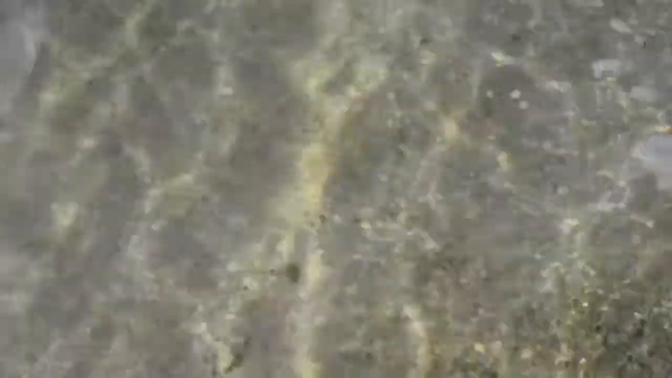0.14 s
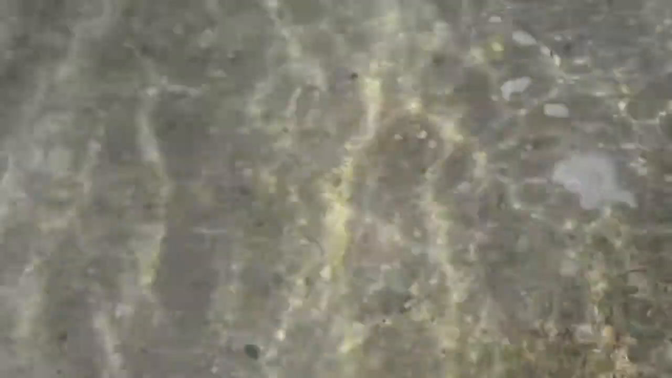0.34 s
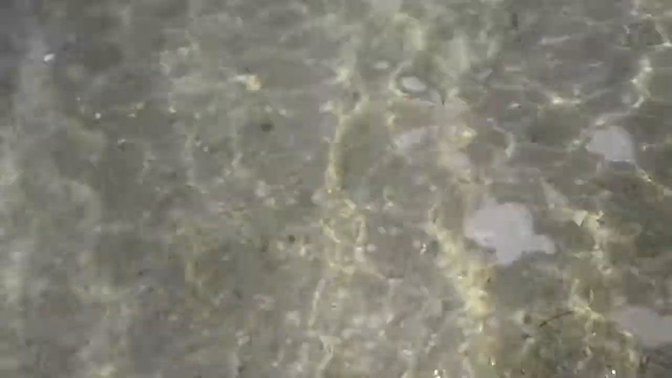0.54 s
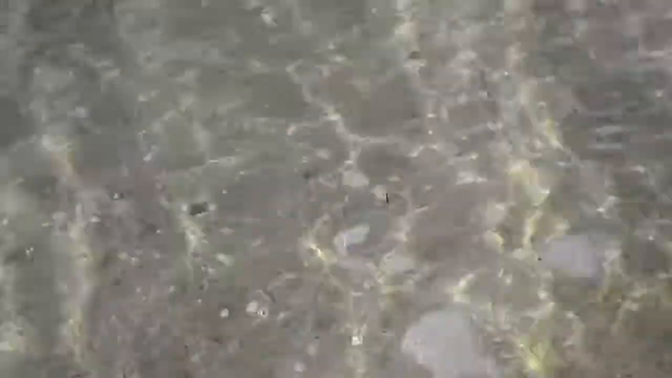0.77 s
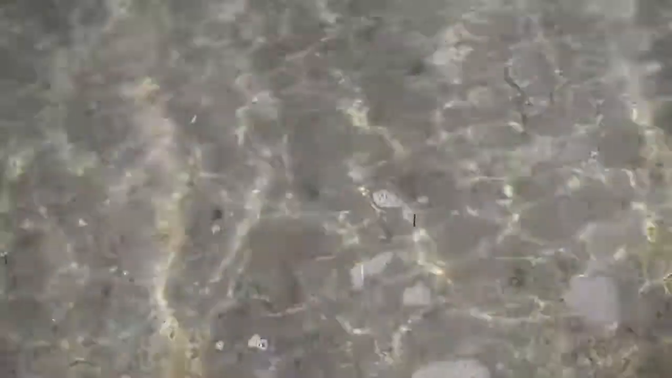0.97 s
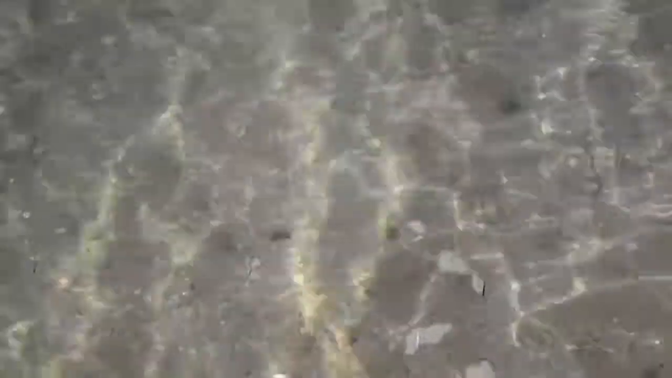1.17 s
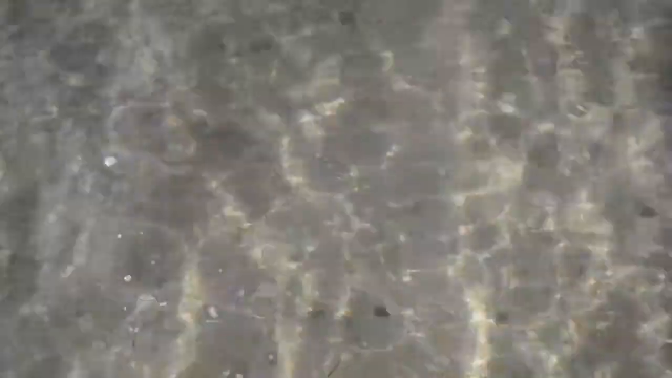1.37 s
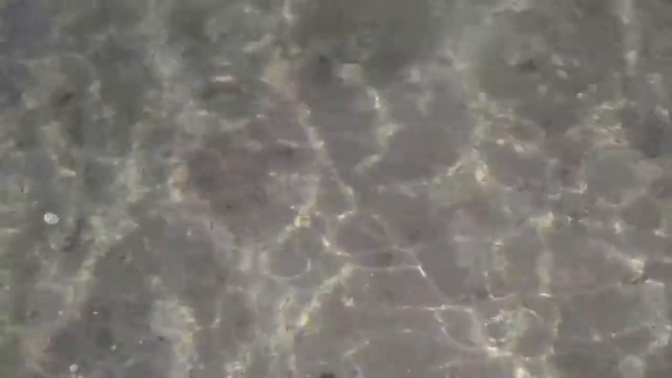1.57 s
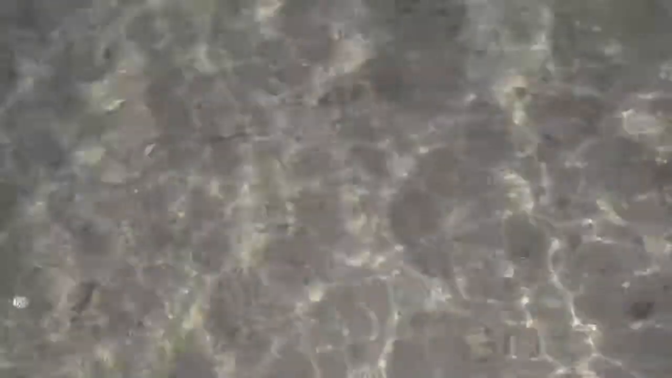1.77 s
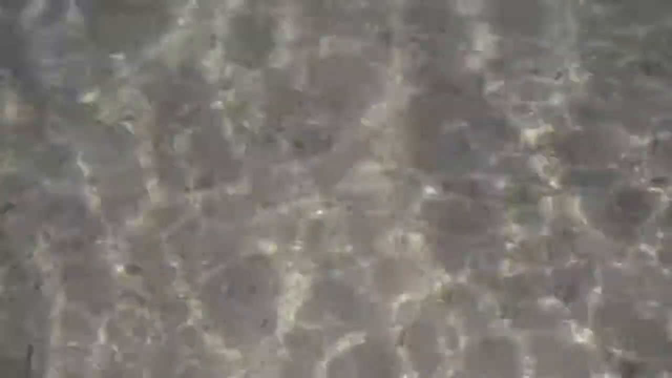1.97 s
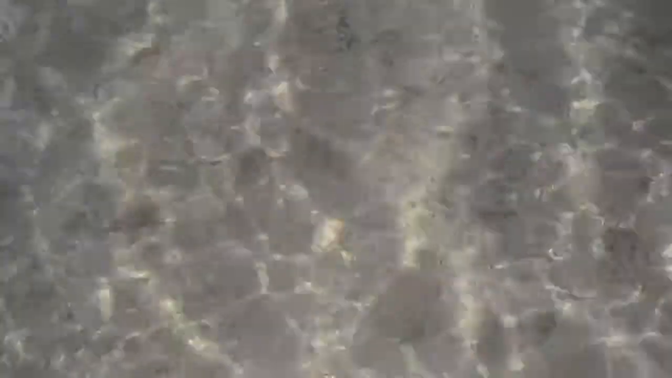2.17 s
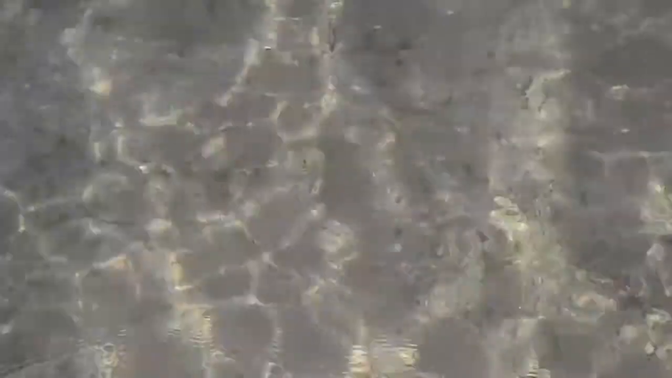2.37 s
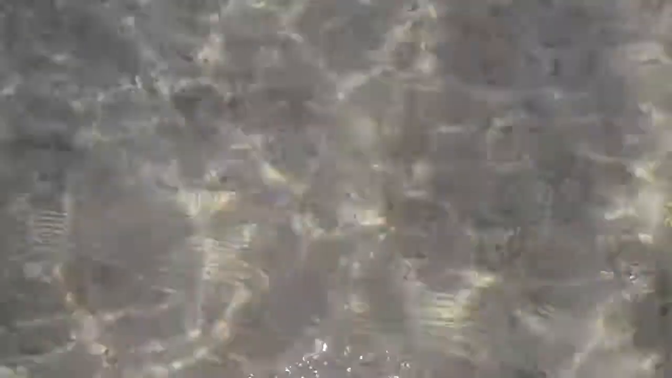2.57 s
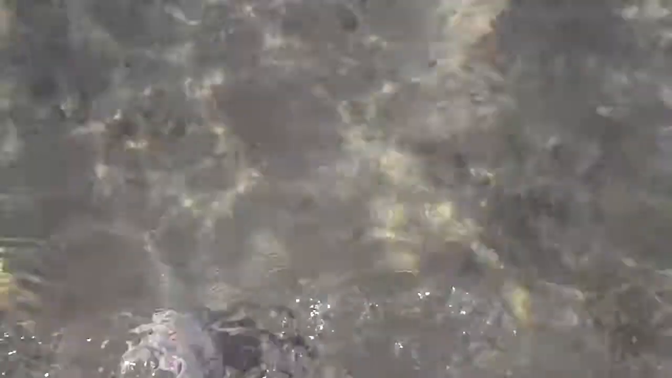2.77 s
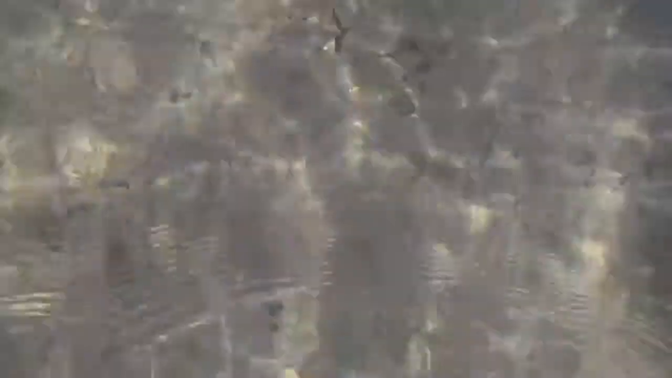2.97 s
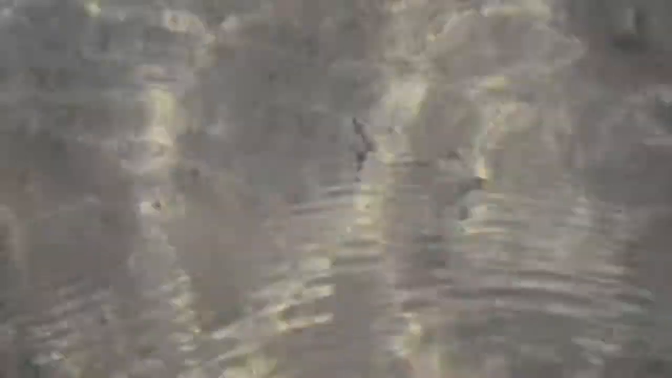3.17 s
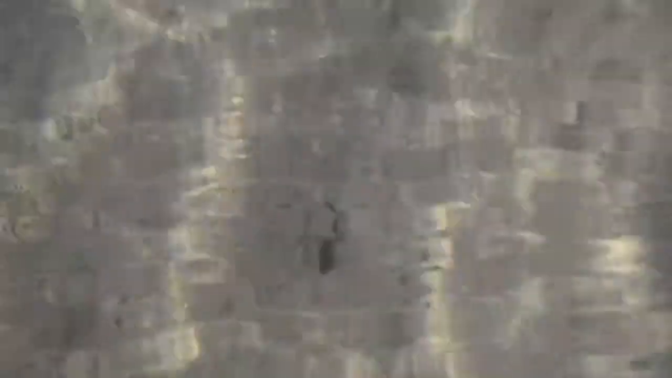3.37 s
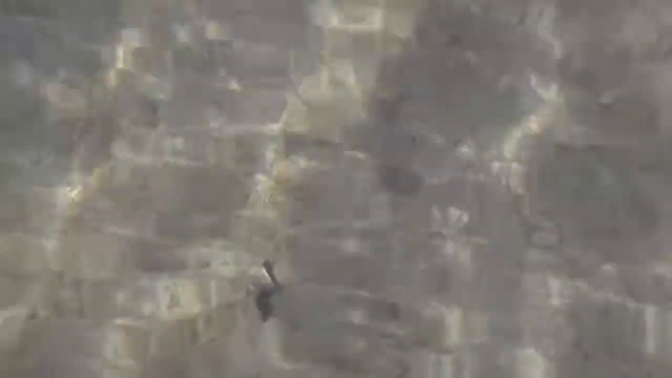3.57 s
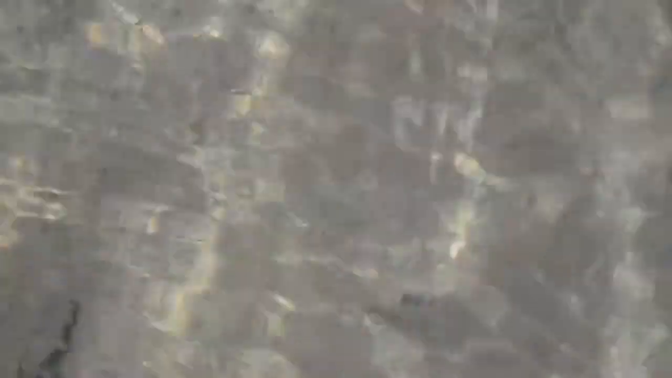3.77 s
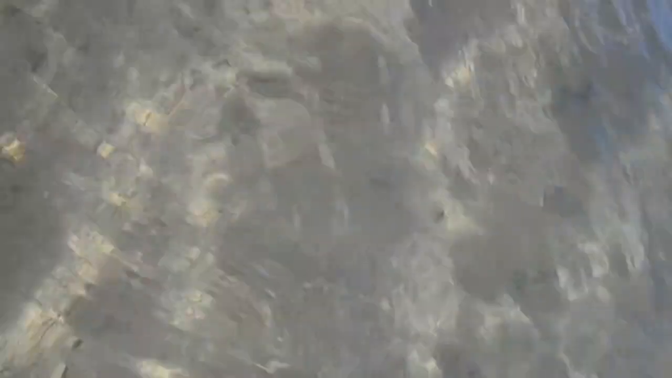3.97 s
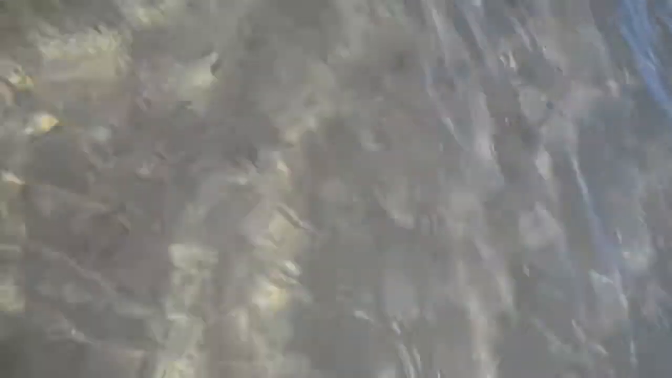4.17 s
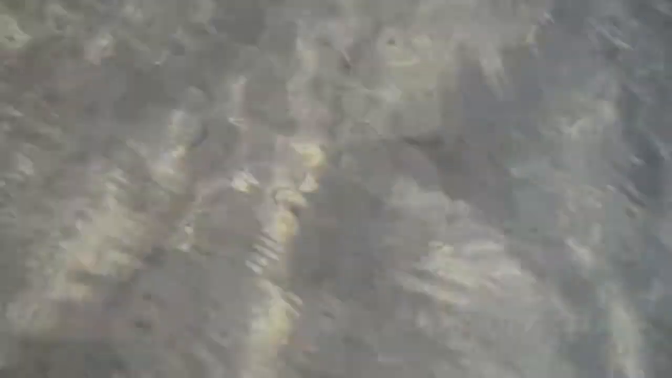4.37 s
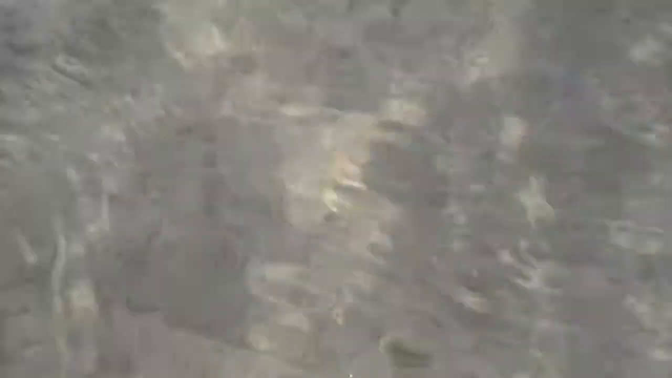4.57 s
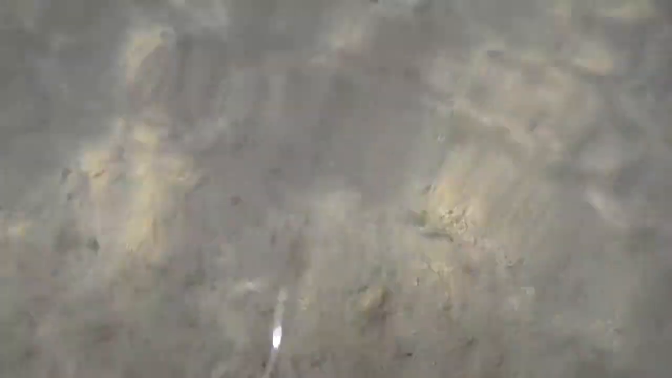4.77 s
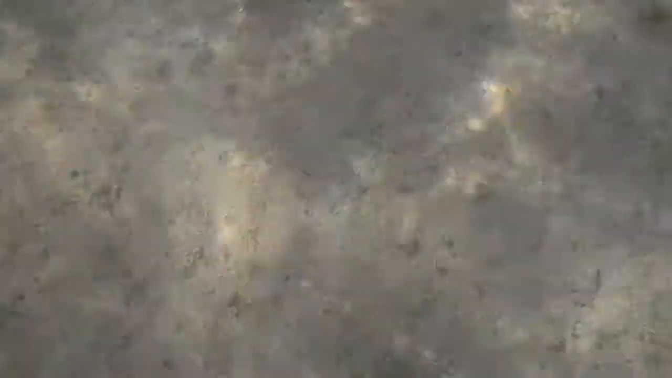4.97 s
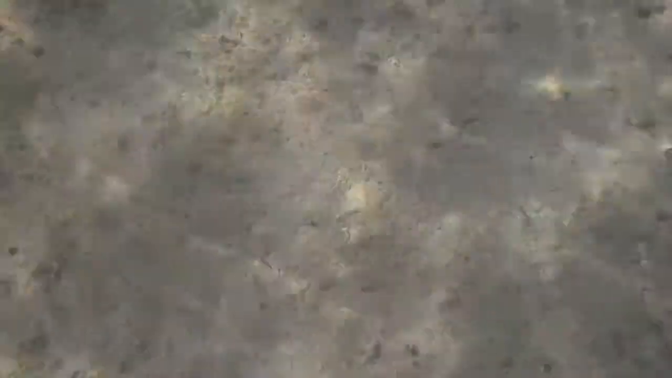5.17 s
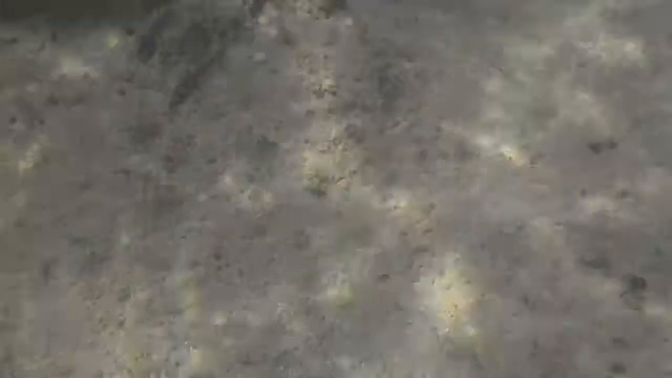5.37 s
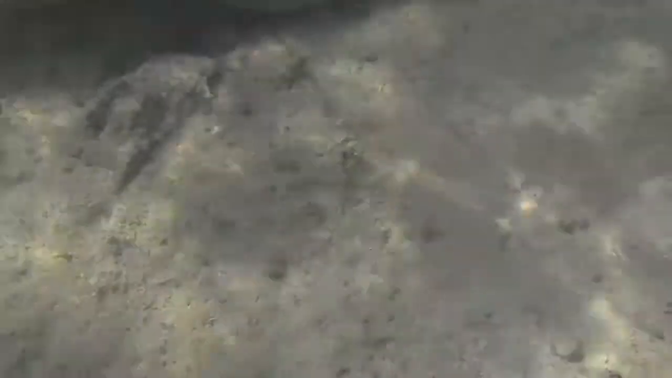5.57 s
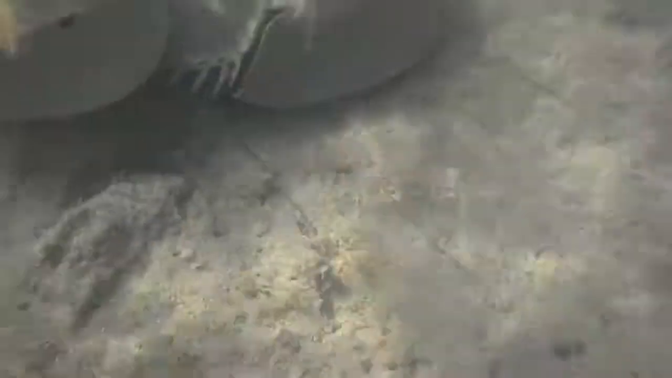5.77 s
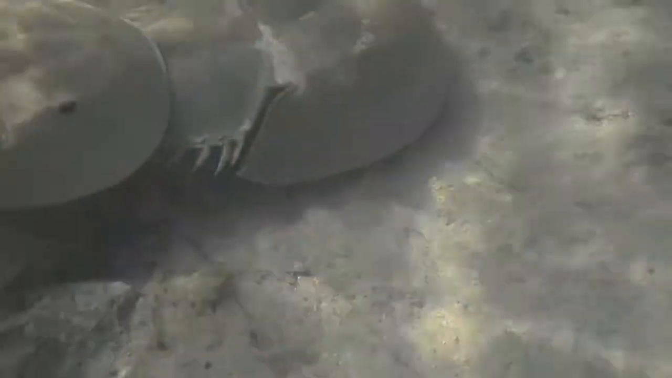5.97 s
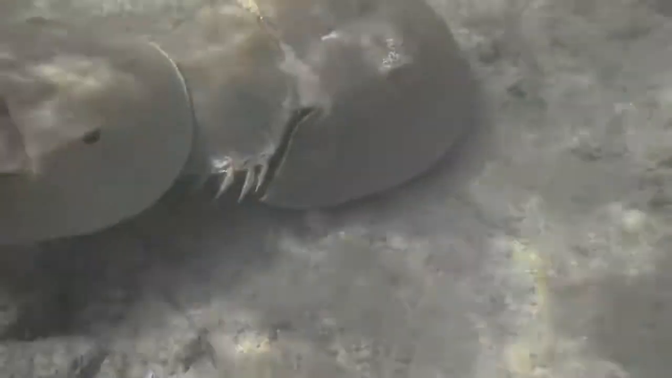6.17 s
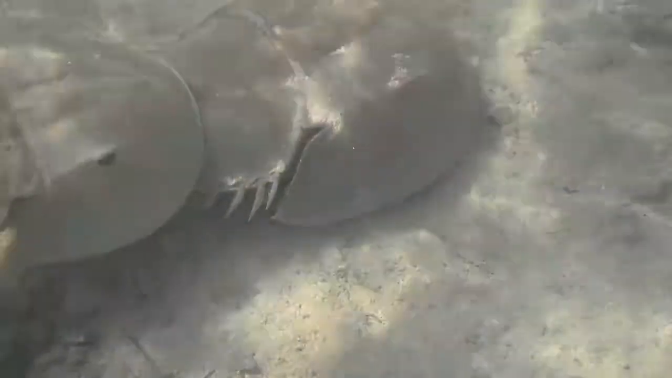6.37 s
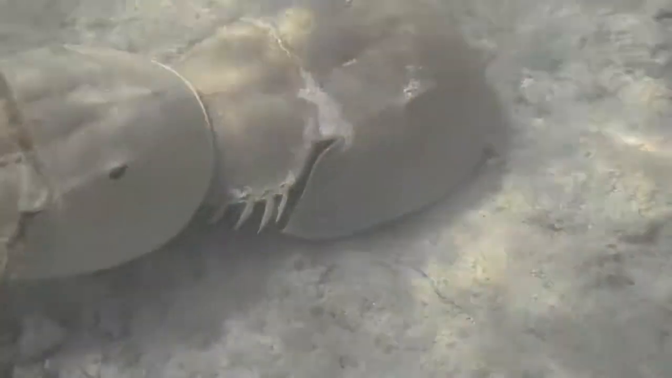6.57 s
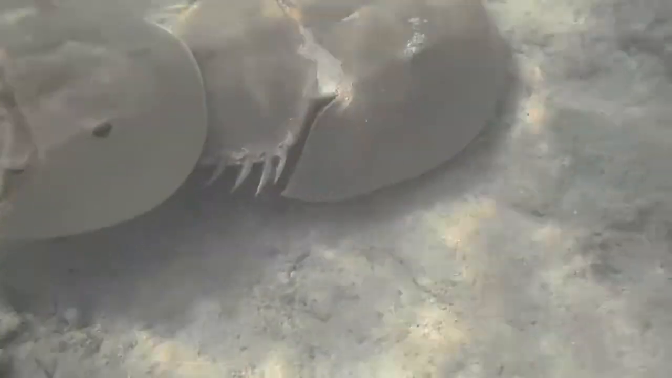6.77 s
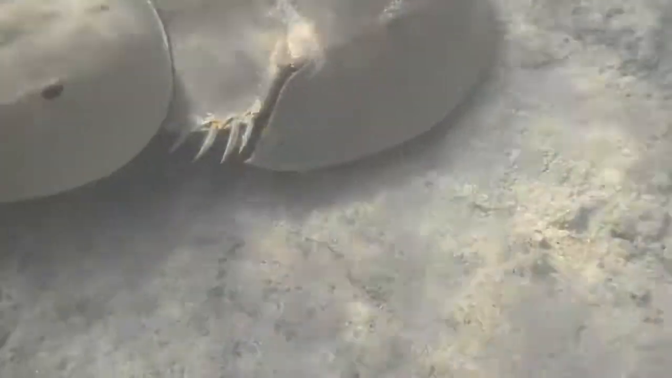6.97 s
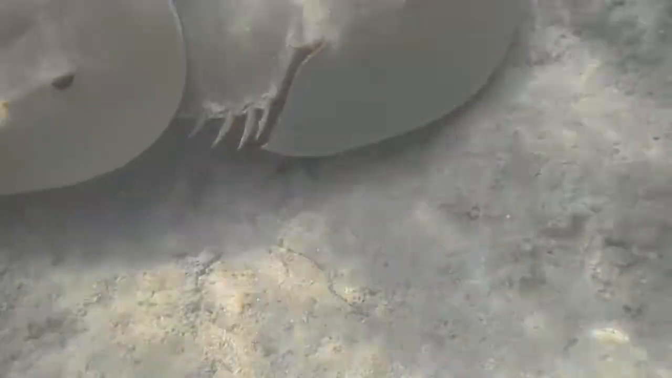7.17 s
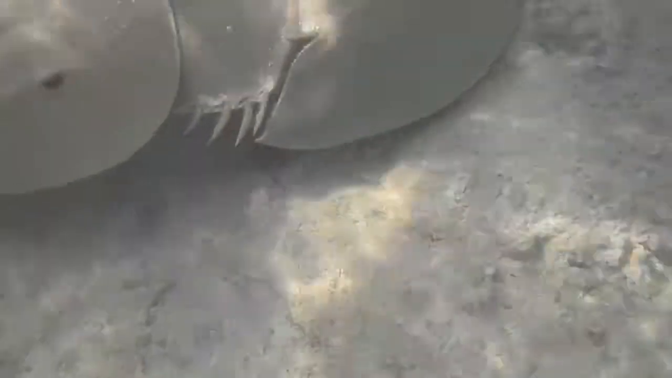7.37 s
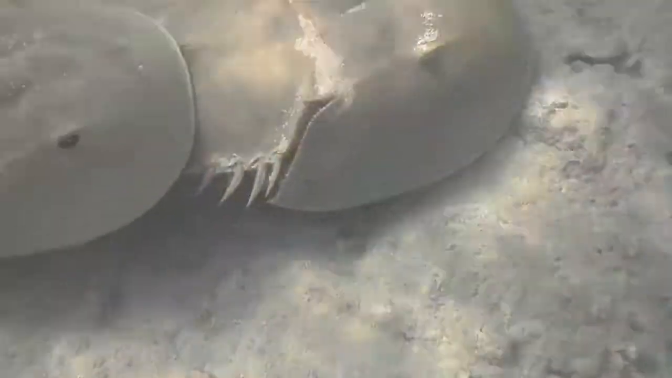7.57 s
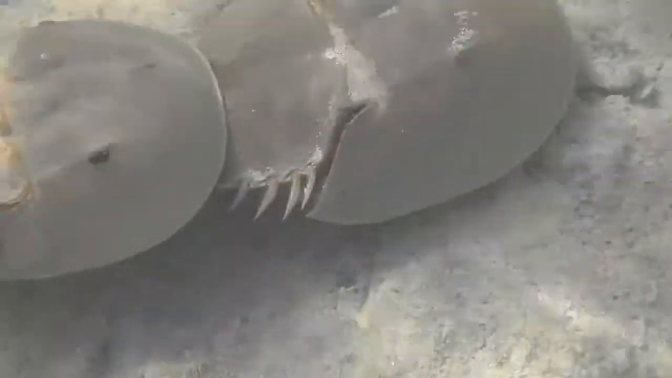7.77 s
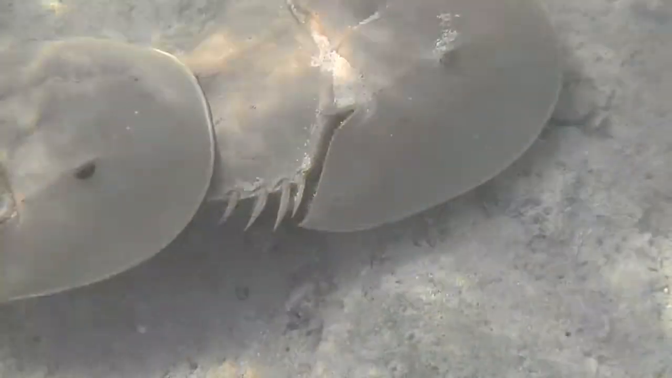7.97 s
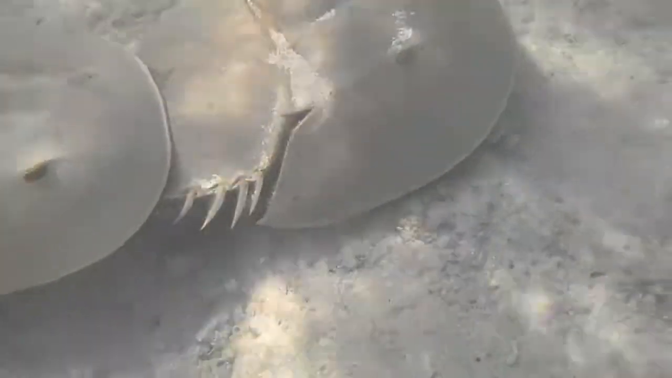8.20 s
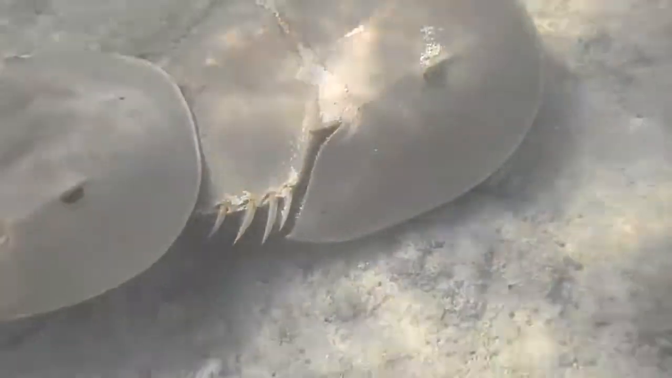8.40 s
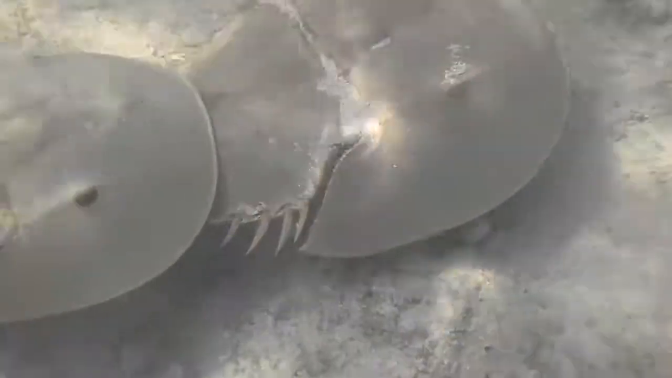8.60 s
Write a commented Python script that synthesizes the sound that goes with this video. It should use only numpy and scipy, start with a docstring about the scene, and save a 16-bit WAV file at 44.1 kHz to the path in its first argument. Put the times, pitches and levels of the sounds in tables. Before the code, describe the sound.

Shallow water washes and fizzes close up, then a splash under the surface brings loud, low glugs of air and a muffled rumble.

```python
"""Shallow water, very close, on the one microphone of a small camera in a waterproof housing.
For five seconds it is carried over the surface: wash and fizz, bubbles plopping, water knocking, ticking
and spurting on the housing. Then it is pushed under with a splash. Air leaves the housing in loud glugs,
each a neck of air parting and a pocket ringing, that overload the preamplifier. They come first in a
flurry, then ever more rarely, over a muffled underwater rumble and murmur."""
import sys
import numpy as np
from scipy import signal
from scipy.io import wavfile
from scipy.ndimage import uniform_filter1d

SR = 44100
rng = np.random.default_rng(int(sys.argv[2]) if len(sys.argv) > 2 else 0)


def to_wav(sig):
    """Store sig (one row per channel, or 1-D mono) as 16-bit WAV at the path in sys.argv[1].

    Samples outside -1..1 are clipped; the rate is SR.
    """
    pcm = np.clip(np.atleast_2d(sig), -1, 1) * 32767
    pcm = np.round(pcm).astype(np.int16)
    wavfile.write(sys.argv[1], SR, pcm.T)  # frames by channels


N = 380935
DIVE_S = 5.1

# Air pinching off at the housing. Each row: time in seconds, snap level in dB, ring level in dB,
# pitch of the air pocket in Hz, its t60 in seconds.
GLUGS = [(5.091, 0, -18, 99, .06), (5.101, 0, -25, 100, 0.14), (5.123, 0, -28, 98, .1),
         (5.152, -4.5, -16, 99, 0.11), (5.191, -6, -26, 94, .1), (5.207, 6, -4, 83, 0.062),
         (5.259, -9, -26, 100, 0.11), (5.267, 4.5, -17, 76, 0.077), (5.313, 1, -4.5, 94, 0.14),
         (5.324, 8, -13, 128, 0.065), (5.356, -6, -9, 78, 0.11), (5.423, 12.5, -8.5, 84, 0.25),
         (5.476, -5.5, -16, 101, 0.15), (5.51, 4, -4.5, 98, 0.13), (5.558, 3.5, -8, 101, 0.067),
         (5.613, 3.5, -10.5, 167, 0.054), (5.669, -3, -32, 101, .1), (5.679, -2.5, -13, 166, 0.041),
         (5.755, 1.5, -10, 149, 0.049), (5.812, -6.5, -14.5, 108, 0.11), (5.844, 4.5, -5, 165, 0.054),
         (5.924, 12.5, -8, 101, 0.18), (5.948, 8.5, -7, 82.5, 0.054), (6.015, 9, -6, 105, 0.056),
         (6.046, 12.5, 0, 176, 0.058), (6.159, 13.5, 5, 90, 0.093), (6.279, 12.5, 0, 90, 0.12),
         (6.325, -9.5, -21, 118, .15), (6.422, 12.5, 6.5, 92.4, 0.079), (6.537, 9.5, -0.5, 87.6, 0.18),
         (6.715, 11.5, 1, 93, 0.086), (6.887, -4, -31, 99, .1), (6.896, 13.5, 2.5, 101.4, .12),
         (6.986, 14, 5, 95.5, 0.14), (7.219, 6.5, -4, 93.7, 0.31), (7.779, -4.5, -8.5, 116, 0.16)]
# Modes of the housing. Each row: mean pitch in Hz, relative level in dB, share of the housing's t60.
HOUSING_MODES = [(55, -9, .7), (168, -4, .5), (230, -10, .4), (305, -5, .5)]
# Small bubbles slipping out. Each row: start in seconds, level in dB, starting pitch in Hz.
CHIRPS = [(5.218, -37, 1450), (5.274, -34, 1250), (5.361, -35, 1600), (5.62, -29.5, 1100)]
# Water and hand on the housing. Each row: start in seconds, level in dB, starting pitch in Hz.
KNOCKS = [(0.326, -20, 81), (0.397, -16.5, 138), (0.555, -11.5, 178), (1.235, -14.5, 266),
          (1.547, -9.5, 100), (2.234, -10, 90), (3.31, -24, 108), (3.641, -11.5, 151), (4.045, -12, 111),
          (4.063, -7.5, 108), (4.091, -8, 72.5), (4.184, -8, 106), (4.947, -4.5, 73.4), (4.986, -2.5, 144),
          (5.046, -5.5, 380), (5.465, -3, 296), (5.94, -6.5, 160), (6.378, -7, 73), (7.193, -8.5, 106),
          (7.744, 1, 96), (8.35, -11.5, 73), (8.39, -7, 116)]
# Bubble plops and, near 3.5 kHz, short ringing ticks on the housing.
# Each row: start in seconds, level in dB, starting pitch in Hz.
PLOPS_AND_TICKS = [(.268, -24.5, 790), (.289, -30.5, 4100), (0.655, -12, 1074), (0.764, -24, 3530),
                   (0.807, -18.5, 470), (1.023, -13.5, 1650), (1.185, -24, 715), (1.243, -19.5, 740),
                   (1.327, -21, 1010), (1.413, -23.5, 760), (1.589, -24.5, 3430), (1.656, -24, 3350),
                   (2.242, -23, 4100), (2.37, -28.5, 3540), (2.42, -28, 3400), (2.509, -26.5, 3260),
                   (2.626, -27, 1180), (2.719, -27, 684), (2.87, -23, 2530), (2.91, -23, 3320),
                   (3.204, -21.5, 1000), (3.323, -14, 860), (3.643, -13, 2620), (3.67, -22, 830),
                   (3.802, -16, 3550), (3.902, -11.5, 760), (3.959, -18, 633), (4.912, -12.5, 656),
                   (5.025, -14, 920), (5.034, -20, 1900), (5.047, -12.5, 2680), (5.15, -22, 1720),
                   (5.189, -18, 4440), (5.212, -19, 1500), (5.269, -22.5, 1415), (5.388, -36, 2650),
                   (5.404, -16.5, 1180), (5.465, -12.5, 1230), (5.495, -16.5, 1330), (5.542, -40, 1290),
                   (5.599, -15, 960), (5.599, -29, 2050), (5.667, -30, 1270), (5.811, -23.5, 1330),
                   (5.833, -30.5, 3300), (5.879, -37.5, 2300), (5.962, -25.5, 3190), (6.17, -17.5, 920),
                   (6.288, -21, 1030), (6.541, -14, 1280), (7.146, -28.5, 3610), (7.366, -14, 516),
                   (7.367, -22.5, 1210), (8.35, -18, 800), (8.36, -18.5, 817), (8.369, -17, 502),
                   (8.383, -14.5, 425), (8.504, -28.5, 730)]
# Drops on the housing. Each row: start in seconds, level in dB ahead of the cavity.
DROPS = [(0.338, -29), (1.022, -24), (1.656, -42), (1.982, -21.5), (2.242, -15.5), (2.572, -23),
         (2.911, -40), (3.643, -7.5), (3.801, -13), (3.903, -16), (4.912, -26), (5.022, -22), (5.035, -7),
         (5.189, -23), (5.211, -22), (5.356, -20), (5.426, -25), (5.464, -28), (6.268, -49)]
# Air cavity in front of the microphone. Each row: pitch in Hz, bandwidth in Hz, relative level in dB.
CAVITY_MODES = [(1500, 380, -10.5), (2330, 300, 22), (2850, 205, 17.5), (3530, 81, 12.5), (4500, 870, -46),
                (6500, 3800, -36)]
# Gushes over the housing. Each row: start and length in seconds, level in dB, brightness in dB
# (added to a bright hiss, taken off a dull one).
SPURTS = [(2.229, 0.078, -34, -6), (2.872, 0.092, -50, 9), (3.438, .03, -39, 8), (3.471, 0.35, -41, 5),
          (4.085, 0.071, -31.5, -4.5), (4.152, 0.092, -33.5, -1.5), (4.182, 0.039, -34.5, 1),
          (4.226, 0.081, -35.5, -6.5), (4.366, 0.062, -32, -7), (4.432, 0.025, -39, 6),
          (4.631, 0.041, -42, 8), (4.894, 0.055, -21.5, -2.5), (4.949, 0.02, -18.5, -1),
          (4.958, 0.068, -47, 4), (4.996, 0.0083, -21.5, -1.5), (5.054, 0.0094, -16.5, -7.5),
          (6.627, 0.058, -28, -26), (8.325, 0.095, -28, -28)]
# The surface. Each row: time in seconds, slosh level in dB, babble level in dB, babble resonance in Hz.
WASH = [(.045, -40.5, -45, 450), (.3, -37.5, -39, 420), (.6, -40.5, -34.5, 830), (.9, -39, -37.5, 473),
        (1.5, -34.5, -35.5, 443), (2.15, -41, -31.5, 440), (2.55, -37, -33, 490), (2.75, -33.5, -36, 870),
        (2.95, -38.5, -32, 1010), (3.15, -34.5, -36.5, 910), (3.4, -30.5, -30, 740), (4.1, -36.5, -35, 704),
        (4.88, -37, -36.5, 706), (5.1, -34, -40.5, 600)]
# Ripples and foam. Each row: time in seconds, level in dB, tilt of the hiss in dB an octave.
FIZZ = [(.045, -50.5, 0), (.27, -50.5, -1), (.6, -34, -1.5), (.93, -45.5, 0), (1.05, -37, -7),
        (1.35, -48, 3), (2.0, -44.5, -4.5), (2.6, -46.5, -1), (3.3, -50.5, 0.5), (3.9, -47.5, -3.5),
        (4.55, -49.5, 1.5), (4.85, -56, -2.5), (5.1, -32, -18)]
# The bed below the surface. Each row: time in seconds, rumble level in dB, murmur level in dB.
UNDERWATER = [(5.0, -27, -58), (5.3, -26, -51), (5.6, -27.5, -57), (5.72, -43, -58), (5.9, -26, -48.5),
              (6.15, -26, -41), (6.4, -20, -40.5), (6.7, -29, -41.5), (7.1, -27.5, -38.5),
              (7.5, -36.5, -40), (7.9, -35, -39.5), (8.64, -34.5, -42)]
# Spectra of the water noises. Each row: frequency in Hz, relative level in dB.
SPURT_COLOUR = [(400, -8), (800, 7.5), (1700, -4), (2300, -2.5), (2900, -7), (3650, -1), (4100, -8),
                (4600, -9.5), (5400, -15), (6000, -23), (7500, -31.5), (14000, -49)]
SLOSH_COLOUR = [(20, -20), (60, 0.5), (95, 2), (180, 1.5), (300, -7), (500, -49), (1200, -19), (5000, -60)]
BABBLE_COLOUR = [(150, -23.5), (300, 2.5), (600, -9), (950, -7.5), (1300, -26.5), (2000, -44.5),
                 (5000, -62)]
FIZZ_COLOUR = [(500, -20), (1100, 6), (1600, 3), (2300, -2.5), (2900, -4), (3600, 3.5), (4600, -10.5),
               (6000, -17), (8000, -26), (14000, -67)]
RUMBLE_COLOUR = [(20, -6), (50, 8), (100, 0), (210, 0), (280, -16), (500, -15.5), (1200, -72)]
MURMUR_COLOUR = [(150, -22), (225, 1.5), (300, -7.5), (500, -5.5), (680, -5), (830, -2), (1250, -0.5),
                 (1700, -1), (2200, -21.5), (3400, -23), (4500, -32), (5500, -42.5), (14000, -58)]


def glug(snap_db, ring_db, pocket_hz, pocket_t60, lead_s):
    """Pressure sags as a neck of air narrows, snaps over when it parts, then the trapped air rings."""
    housing_t60, crack_s = .11, .0001
    t = np.arange(round((lead_s + max(pocket_t60, housing_t60)) * SR)) / SR - lead_s
    after = np.maximum(t, 0)  # seconds since the neck parted
    sag = .75 * np.exp(-(np.minimum(t, 0) / .0022) ** 2)
    swing_hz = 88.16 + 4.18 * max(-snap_db, 0)  # weak snaps: narrower necks, faster swing
    swing = gain_of(-60 * after / .026) * np.cos(2 * np.pi * swing_hz * after * (1 + 25 * after) - .5)
    turnover = np.tanh(19.21 * swing_hz * t / gain_of(.43 * snap_db))  # slower for strong snaps
    snap = gain_of(snap_db) * turnover * np.where(t < 0, sag, swing)
    crack = gain_of(-42 + 1.7 * snap_db) * (after / crack_s * np.exp(1 - after / crack_s)) ** 2
    bend = 1.1 * (1 - np.exp(-after / .019))  # the ring starts sharp and settles
    ring = np.sin(2 * np.pi * pocket_hz * after + bend) * gain_of(-60 * (after / pocket_t60) ** .82)
    housing_db = 3.5 - .06 * ring_db  # the housing follows a louder pocket only partly
    for hz, db, share in HOUSING_MODES:
        phase = 2 * np.pi * (hz * rng.uniform(.89, 1.105) * after + rng.random())
        ring += gain_of(db + housing_db - 60 * after / (share * housing_t60)) * np.sin(phase)
    onset = 1 - np.exp(-(after / .0023) ** 2)
    return snap + crack + gain_of(ring_db) * ring * onset


def glugs():
    """Air leaves the housing gulp by gulp, right at the microphone."""
    out, lead_s = np.zeros(N), .008
    for s, *shape in GLUGS:
        add(out, s - lead_s, glug(*shape, lead_s))
    return out


def froth():
    """Each glug sheds a short cloud of small bubbles."""
    cloud, t = np.zeros(N), np.arange(round(.06 * SR)) / SR
    for s, snap_db, *_ in GLUGS:
        add(cloud, s + .002, gain_of(.5 * snap_db + rng.normal(0, 3) - 60 * t / .041))
    low = swarm(664, 1700, per_s=220, cycles=15, spread_db=3)
    high = swarm(1800, 3850, per_s=120, cycles=12, spread_db=3)
    return cloud * (gain_of(-28.5) * low + gain_of(-41.5) * high)


def chirps():
    """Small bubbles whistle upwards as they slip out."""
    out = np.zeros(N)
    for s, db, hz in CHIRPS:
        add(out, s, gain_of(db) * rising_ring(hz, t60=.024, glide=.7, sharpness=1.1))
    return out


def knocks():
    """Handling noise: water and hand bump the housing, which gives a short, low ring."""
    out = np.zeros(N)
    for s, db, hz in KNOCKS:
        add(out, s, -gain_of(db) * rising_ring(hz, t60=.041, glide=.11))
    return out


def plops_and_ticks():
    """Bubble plops and short, high, ringing ticks on the housing: each a main tone and two weaker ones."""
    out = np.zeros(N)
    for s, db, hz in PLOPS_AND_TICKS:
        glide = .16 if s > DIVE_S else .1
        for k, (detune, delay) in enumerate(rng.random((3, 2))):
            tone_hz, tone_db = (hz, db) if k == 0 else (hz * (.677 + .763 * detune), db - 11)
            t60 = .026 * (1000 / tone_hz) ** .75  # high tones die sooner
            add(out, s + .003 * delay * k, gain_of(tone_db) * rising_ring(tone_hz, t60, glide))
    return out


def drops():
    """Drops tick on the housing and ring the air cavity in front of the microphone."""
    hits, t = np.zeros(N), np.arange(256) / SR
    for s, db in DROPS:
        spray = rng.standard_normal(len(t)) * np.exp(-t / .0021)
        add(hits, s, gain_of(db) * spray / np.linalg.norm(spray))
    t = np.arange(400) / SR
    cavity = sum(gain_of(db) * np.exp(-np.pi * width * t) * np.sin(2 * np.pi * hz * t)
                 for hz, width, db in CAVITY_MODES)
    return signal.oaconvolve(hits, cavity / abs(cavity).max())[:N]


def spurts():
    """Water gushes over the housing: rough hiss that starts and stops abruptly."""
    dull = noise(SPURT_COLOUR, patchy_db=2, flicker_db=.7, size=256, eq=lambda t, hz: tilt(-14, hz))
    bright = noise(SPURT_COLOUR, patchy_db=2, flicker_db=.7, size=256, eq=lambda t, hz: tilt(5, hz))
    out, edges_s = np.zeros(N), .021  # rise and fall together
    for start, length, db, brightness in SPURTS:
        span = slice(round(start * SR), round((start + length) * SR))
        hiss = unit_rms(gain_of(-brightness) * dull[span] + gain_of(brightness) * bright[span])
        swell_db = np.linspace(0, 1, len(hiss))
        gate = signal.windows.tukey(len(hiss), min(edges_s / length, .6))
        add(out, start, gain_of(db + swell_db) * gate * hiss)
    return out


def wash():
    """The surface just below the microphone: low slosh, and a babble of bubbles and resonant noise."""
    def resonance_db(t, hz):
        return 9 * np.exp(-(np.log((hz + 1) / curve(WASH, t, 3)) / .3) ** 2)
    slosh = noise(SLOSH_COLOUR, patchy_db=.75, flicker_db=2.6, size=1024)
    babble = noise(BABBLE_COLOUR, patchy_db=2.5, flicker_db=.17, size=512, eq=resonance_db)
    babble += gain_of(-3.5) * swarm(272.4, 1258, per_s=200, cycles=14.4, spread_db=1.54)
    return level(WASH, 1) * slosh + level(WASH, 2) * unit_rms(babble)


def fizz():
    """Ripples and foam before the dive: flickering hiss and tiny bubbles."""
    hiss = noise(FIZZ_COLOUR, patchy_db=2.6, flicker_db=1.2, size=256,
                 eq=lambda t, hz: tilt(curve(FIZZ, t, 2), hz))
    foam = swarm(1430, 4540, per_s=300, cycles=17.5, spread_db=3.4)
    return level(FIZZ, 1) * unit_rms(hiss + gain_of(-3) * foam)


def underwater():
    """The background once submerged: lumpy rumble and smooth murmur through the flooded port."""
    rumble = noise(RUMBLE_COLOUR, patchy_db=2.65, flicker_db=2.2, size=1024)
    murmur = noise(MURMUR_COLOUR, patchy_db=1.9, flicker_db=1, size=512)
    return level(UNDERWATER, 1) * rumble + level(UNDERWATER, 2) * murmur


def rising_ring(hz, t60, glide, sharpness=2.8):
    """A damped sine that climbs like a bubble nearing the surface, by 2 * glide * hz over t60 seconds."""
    t = np.arange(round(max(t60, .004) * SR)) / SR
    onset = 1 - np.exp(-(t * hz * sharpness) ** 2)
    return gain_of(-60 * t / t60) * onset * np.sin(2 * np.pi * hz * t * (1 + glide * t / t60))


def swarm(lo_hz, hi_hz, per_s, cycles, spread_db):
    """Many small bubbles of random size, a few of them loud, each ringing for about `cycles` periods."""
    out, chances = np.zeros(N), 5000
    kinds = [rising_ring(hz, cycles / hz, glide=.2, sharpness=1.1)
             for hz in np.geomspace(lo_hz, hi_hz, 24)]
    for when, kind, strength, draw in rng.random((chances, 4)):
        if draw < per_s * N / SR / chances:
            db = spread_db * min(-np.log(1 - strength), 3.5)
            add(out, when * N / SR, gain_of(db) * kinds[int(kind * len(kinds))])
    return unit_rms(out)


def noise(colour, patchy_db, flicker_db, size, eq=lambda t, hz: 0):
    """Water noise in frames of `size` samples: drifting patches, a flickering level, eq(t, hz) in dB."""
    hop = size // 4
    frames, hz = N // hop + 5, np.fft.rfftfreq(size, 1 / SR)[:, None]
    real, imag, patches = rng.standard_normal((frames, len(hz), 3)).T
    patches = uniform_filter1d(patches, size=size // 64, axis=0)
    patches = unit_rms(uniform_filter1d(patches, size=4096 // size, axis=1))
    colour_hz, colour_db = np.transpose(colour)
    spectrum_db = np.interp(np.log(hz + 1), np.log(colour_hz + 1), colour_db)
    shape = gain_of(spectrum_db + eq(np.arange(frames) * hop / SR, hz))
    shape /= np.sqrt((shape ** 2).sum(axis=0))  # eq moves the colour, not the power
    flicker = np.minimum(uniform_filter1d(rng.exponential(1, frames), size=2), 4)
    spectra = (real + 1j * imag) * shape * gain_of(patchy_db * patches + flicker_db * flicker)
    return unit_rms(signal.istft(spectra, nperseg=size, noverlap=size - hop)[1][:N])


def tilt(db_per_octave, hz):
    """A treble slope in dB that flattens out in the bass."""
    return db_per_octave * np.log2((hz + 300) / 3500)


def gain_of(db):
    """dB to gain."""
    return 10 ** (np.asarray(db) / 20)


def unit_rms(x):
    """Scales to rms 1."""
    return x / np.sqrt(np.mean(x ** 2) + 1e-20)


def curve(rows, t, column):
    """One column of a table at times t."""
    return np.interp(t, [r[0] for r in rows], [r[column] for r in rows])


def level(rows, column):
    """Gain along a dB column, silent outside the table."""
    t = np.arange(N) / SR
    return gain_of(curve(rows, t, column)) * (t >= rows[0][0]) * (t <= rows[-1][0])


def add(mix, s, sound):
    """Mixes a sound in at s seconds."""
    part = mix[round(s * SR):][:len(sound)]
    part += sound[:len(part)]


def scene():
    """Everything meets at the one microphone in the housing."""
    water = wash() + fizz() + spurts() + underwater()
    return (water + glugs() + knocks() + plops_and_ticks() + chirps() + drops() + froth())[None]


def record(dry):
    """The preamplifier saturates on the glugs; its coupling lets flat tops sag; the top treble is cut."""
    ceiling, knee, coupling_hz, edge_hz = .63, 3.2, 6, 14400
    clipped = dry / (1 + abs(dry / ceiling) ** knee) ** (1 / knee)
    coupled = signal.lfilter(*signal.butter(1, coupling_hz, "high", fs=SR), clipped)
    lowpass = signal.firwin(511, edge_hz, window=("kaiser", 9), fs=SR)
    return signal.oaconvolve(coupled, lowpass[None], "same")


dry = scene()
out = record(dry)
to_wav(out)
```